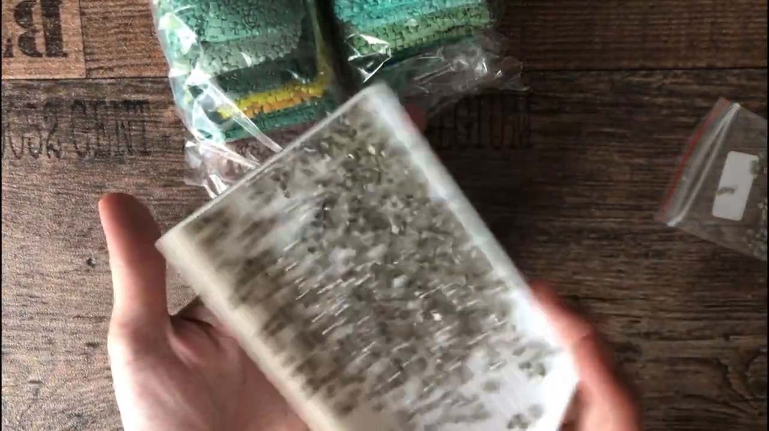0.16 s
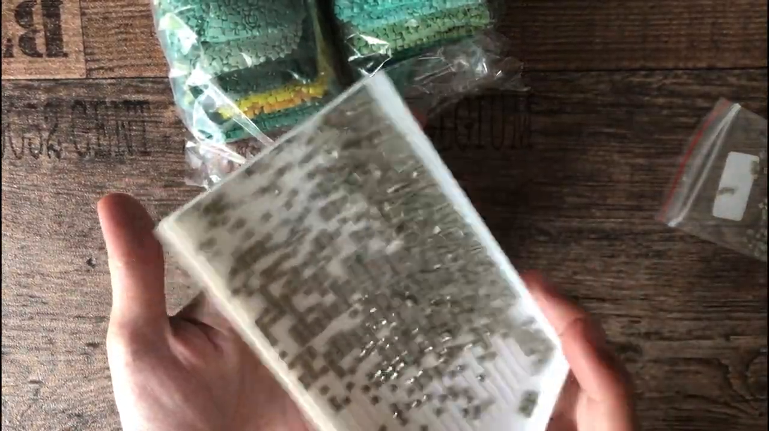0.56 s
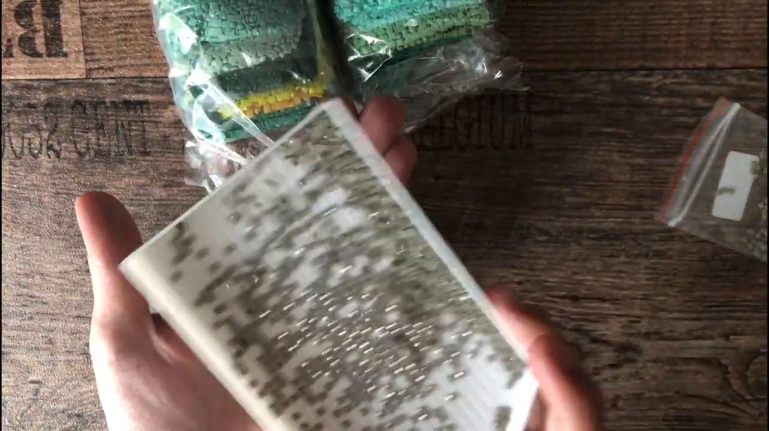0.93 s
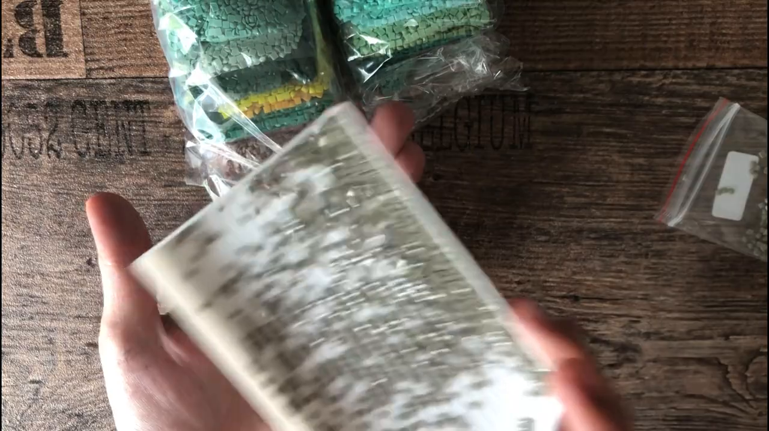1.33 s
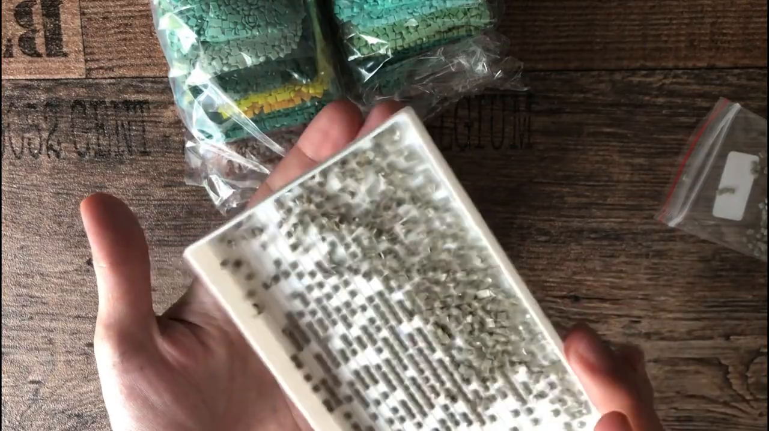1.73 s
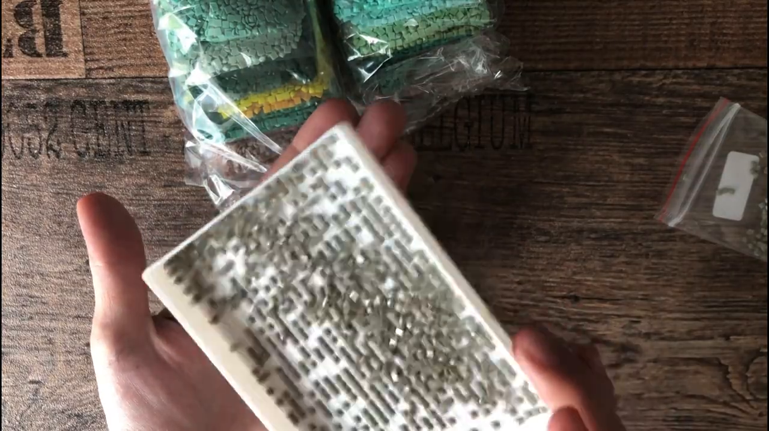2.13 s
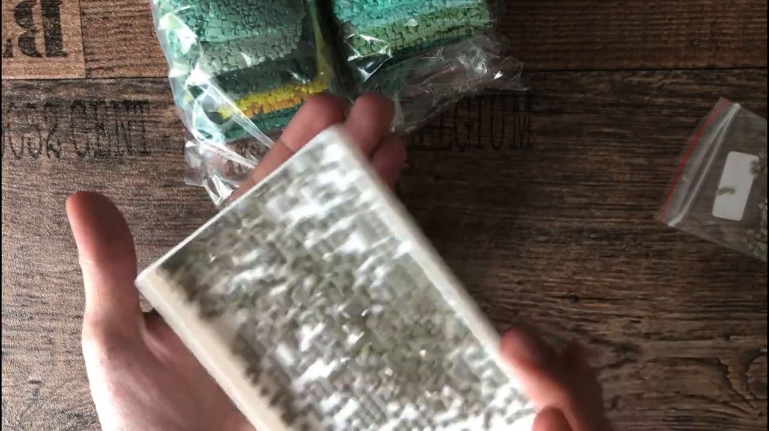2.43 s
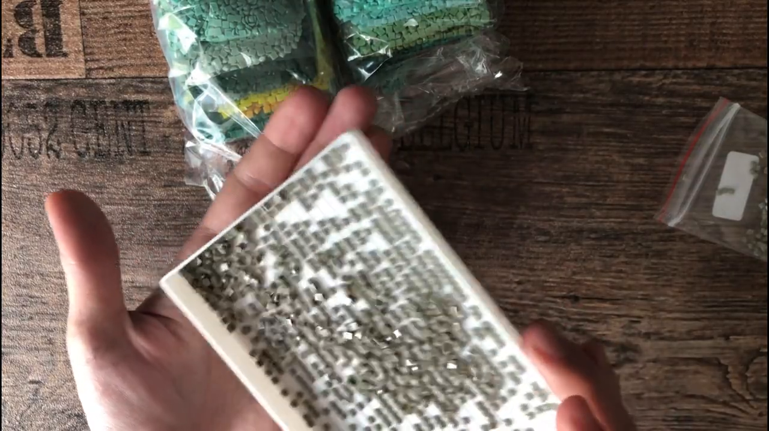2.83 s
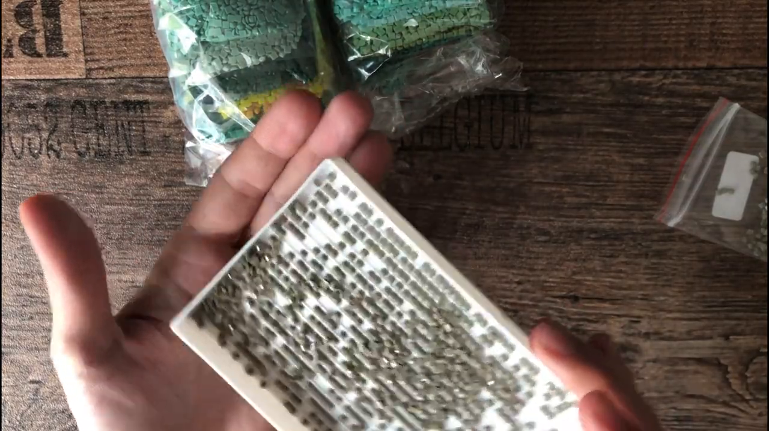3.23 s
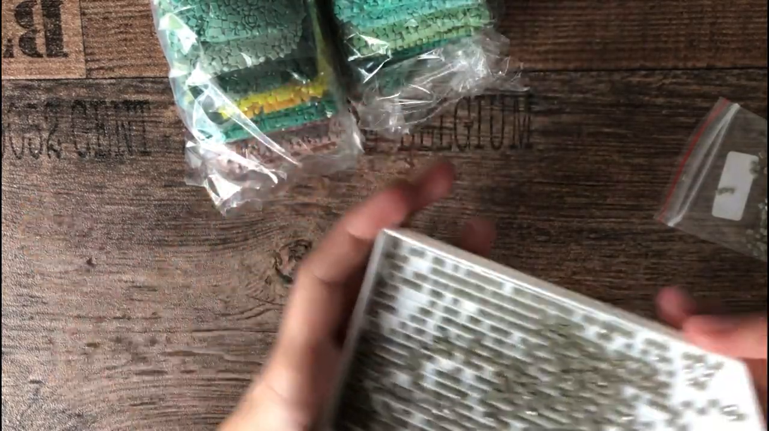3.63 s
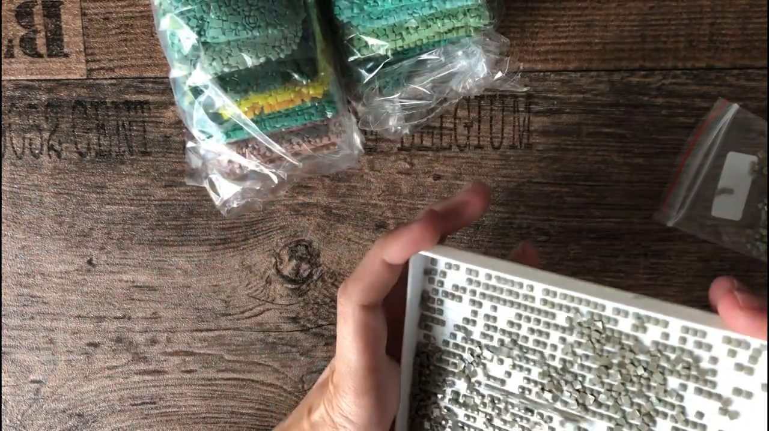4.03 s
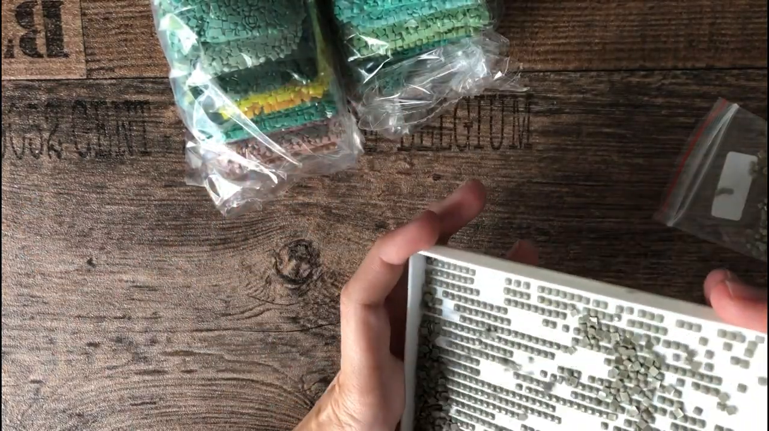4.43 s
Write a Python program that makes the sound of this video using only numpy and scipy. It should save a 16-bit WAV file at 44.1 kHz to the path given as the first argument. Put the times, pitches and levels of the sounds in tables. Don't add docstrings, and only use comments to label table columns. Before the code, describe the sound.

A dry, bright rattle of tiny hard beads in a thin ridged plastic tray, surging with each wrist stroke, about ten strokes in the first second, then slower swishes. One soft low knock against the palm. The colour shifts slightly as the tray tilts. After three seconds the shaking cuts off into low room hum, followed by a light trickle of crisp clicks. Close mono phone pickup, little reverb.

```python
import sys
import numpy as np
from scipy import signal
from scipy.fft import rfft, irfft
from scipy.io import wavfile
from scipy.ndimage import uniform_filter1d, map_coordinates

SR = 44100
rng = np.random.default_rng(int(sys.argv[2]) if len(sys.argv) > 2 else 0)


def invert_db(level):
    return 10 ** (np.asarray(level, dtype=float) / 20)


def digitize_waveform(pressure):
    field = np.atleast_2d(pressure).T
    bounded = np.clip(field, -1, 1)
    quanta = np.round(bounded * 32767).astype(np.int16)
    wavfile.write(sys.argv[1], SR, quanta)


N = 201729

# hz, density_db [dB per Hz]
ROOM_TONE = [(30, -10), (45, 1), (70, -7.5), (150, 2), (380, -2), (850, -7), (1000, -11), (2500, -19.5),
             (6000, -24), (15000, -27.5)]
ROOM_TONE_DB = -60
# peak_s, level_db
ARM_MOVES = [
    (.21, -63),
    (.86, -58),
    (1.18, -58),
    (1.93, -68),
    (2.7, -69),
    (3.89, -66),
    (4.15, -63),
]
ARM_REST_DB, ARM_HALF_S = -68, 0.068
# hz, t60_s
ROOM_DECAY = [(300, 0.35), (3000, 0.12), (12000, 0.066)]
# start_s, peak_db, hardness_db [dB per octave]
PALM_BUMPS = [
    (.716, -37.5, 11),
    (.7174, -30.3, -3.5),
    (.7527, -42.5, -14),
]
# pitch_hz, level_db, t60_s
TRAY_MODES = [
    (333, 0, .07),
    (640, -15.5, .135),
    (807, -16, .038),
]
# start_s, peak_db, pitch_hz
LONE_GEMS = [(0.5264, -19, 6850), (3.2974, -35, 6260), (3.4294, -48, 3520), (3.4434, -50, 3830),
             (3.5613, -42, 14500), (3.932, -50, 3290), (3.9825, -44, 3870), (3.9914, -51, 5460),
             (4.0264, -49, 7090), (4.0865, -39, 3390), (4.1114, -39, 3070), (4.1597, -37, 3880),
             (4.1664, -34, 3890), (4.24, -32, 3450), (4.2514, -32, 6300), (4.3104, -33, 3040),
             (4.3385, -30, 7000), (4.36, -25.5, 13200), (4.4004, -30, 14200), (4.4144, -29, 11500),
             (4.4204, -29, 12000), (4.4294, -30, 5380), (4.4587, -33, 3780), (4.4959, -32, 5220),
             (4.5104, -30, 14600), (4.5365, -26.5, 15400), (4.5614, -33, 3560)]
# start_s, pose [0 facing the microphone to 5 lowered]
TRAY_POSE = [(0, 0), (.65, 0), (.8, 1), (1.42, 1), (1.52, 2), (1.9, 2), (2.05, 3), (2.6, 3), (2.85, 4),
             (3.6, 4), (3.9, 5), (4.57, 5)]
# hz, density_db [dB per Hz]
POSE_COLOURS = [
    [(631, -12), (1040, -9), (1410, -12), (2150, -1), (3610, -3.5), (5780, -1.5), (7750, -3.5), (15000, -3)],
    [(640, -8), (1280, -12), (1540, -5.5), (2860, -3), (3670, -3), (5780, -1), (8220, -5), (15000, -3)],
    [(1050, -9), (1330, -18), (1790, -4), (3120, -5), (3720, -0.5), (5530, -3.5), (6890, -2.5),
     (15000, -4.5)],
    [(631, -13.5), (1020, -9), (1370, -16.5), (1690, -6), (2070, -1.5), (4010, -2), (5500, -4),
     (15000, -3.5)],
    [(540, -11), (1050, -9), (1600, -13), (1900, -10), (2150, 1), (2800, -2), (3720, 0.5), (15000, -7.5)],
    [(640, -9), (1580, -3.5), (2020, -4.5), (2540, -1), (3850, -1), (6250, -2.5), (8750, -6), (15000, -5.5)],
]
# hz, density_db [dB per Hz]
BASS_SKIRT = [(260, -51), (450, -19.5)]
# start_s, level_db, sparkle_db [above 9 kHz], size_spread_db
SLIDING = [(0, -37, -1, -1), (.88, -39, -1.5, 0.5), (.96, -41, -2.5, 3), (1.47, -55, 4, 3),
           (1.72, -58, 3, 1), (2.32, -43.5, -1.5, -3), (2.99, -47, 0, 2), (3.22, -41, 1, 4),
           (3.33, -59, 0, 3.5), (3.5, -72.5, -1, 3), (3.94, -76, -2, 1), (4.07, -58.5, -2, 0.5),
           (4.28, -47, 1, 1.5), (4.55, -49.5, 2.5, 2.5), (4.575, -55, -2, 2.5)]
# peak_s, peak_db, half_length_s, sparkle_db
WRIST_THROWS = [(0.043, -37, 0.044, -5), (0.15, -34.5, 0.032, -1), (0.238, -37.5, 0.028, -2),
                (0.343, -36, .032, 1.5), (.42, -39.5, .016, 5), (0.519, -34.5, .025, 2.5),
                (0.595, -40, 0.019, 1), (0.694, -39, 0.022, 5), (.772, -39, 0.029, 3),
                (0.857, -36, .028, 4), (1.05, -45, 0.016, -2), (1.165, -40, 0.04, 1),
                (1.308, -38, 0.045, 2), (1.39, -40.5, 0.035, -1.5), (1.52, -45, 0.026, -1),
                (1.634, -36, .089, -1.5), (1.811, -37, 0.042, -1.5), (1.966, -36.5, 0.069, -1.5),
                (2.106, -35, .059, -2), (2.296, -38.5, 0.068, -3.5), (2.467, -38, .046, -3.5),
                (2.59, -37.5, 0.051, -4.5), (2.809, -38.5, .075, 0.5), (2.951, -45, .017, 2),
                (3.09, -41.5, 0.032, 5), (3.205, -34.5, 0.0072, 2), (3.372, -56, 0.023, 1),
                (3.991, -63.5, .031, -3), (4.218, -50.5, .066, -2), (4.42, -53, 0.023, -2)]
THROWN_SPREAD_DB, SPREAD_DRIFT_DB = 1.2, 1.5
RATTLE_TRIM_DB = -0.96
TWO_STROKES = SR // 3


def unit(x):
    return x / np.sqrt(np.mean(x ** 2) + 1e-20)


def along(points, hz):
    f, v = np.transpose(points)
    return np.interp(np.log(hz + 1), np.log(f + 1), v)


def curves(rows):
    s, *columns = np.transpose(rows)
    return [np.interp(np.arange(N) / SR, s, column) for column in columns]


def wobble(rate_hz):
    knots = rng.standard_normal(int(N * rate_hz / SR) + 4)
    return map_coordinates(knots, [np.arange(N) * rate_hz / SR])


def coloured(x, spectrum):
    size = 2048
    hz = np.minimum(np.fft.rfftfreq(size, 1 / SR), 15000)
    cepstrum = irfft(np.log(np.maximum(invert_db(along(spectrum, hz)), 1e-4)))
    folded = np.r_[cepstrum[0], 2 * cepstrum[1:size // 2], np.zeros(size // 2)]
    return signal.fftconvolve(x, irfft(np.exp(rfft(folded))))[:N]


def band(x, lo_hz, hi_hz):
    sos = signal.butter(2, [lo_hz, hi_hz], "band", fs=SR, output="sos")
    return signal.sosfiltfilt(sos, x)


def pings(times_s, sizes, pitch_hz, life_s):
    k = np.arange(96)
    start = np.floor(times_s * SR).astype(int)
    t = (k + 1 - (times_s * SR - start)[:, None]) / SR
    decay = np.exp(-t / life_s[:, None])
    wave = sizes[:, None] * decay * np.cos(2 * np.pi * pitch_hz[:, None] * t)
    return np.bincount((start[:, None] + k).ravel(), wave.ravel(), N + len(k))[:N]


def swells(s, db, half_s):
    t = np.arange(0, N, 32) / SR
    return invert_db(2 * db[:, None]) * np.exp(-((t - s[:, None]) / half_s) ** 2), t


def arm_rumble():
    power, t = swells(*np.transpose(ARM_MOVES), ARM_HALF_S)
    level = np.sqrt(np.interp(np.arange(N) / SR, t, power.sum(0)) + invert_db(2 * ARM_REST_DB))
    return level * invert_db(-3.5) * unit(band(rng.standard_normal(N), 64, 118))


def air():
    level = invert_db(ROOM_TONE_DB + 0.44 * wobble(3.53))
    return level * unit(coloured(rng.standard_normal(N), ROOM_TONE)) + arm_rumble()


def room(x):
    step, wet = SR // 10, np.zeros(N + SR)
    for start in range(0, N, step):
        hz, t, z = signal.stft(rng.standard_normal(SR // 3), SR, nperseg=256)
        decay = invert_db(-60 * t / along(ROOM_DECAY, hz)[:, None])
        tail = signal.istft(z * decay, SR, nperseg=256)[1]
        piece = signal.fftconvolve(x[start:start + step], tail / np.linalg.norm(tail))
        wet[start + 200:][:len(piece)] += piece
    return wet[:N]


def bumps():
    t, x = np.arange(SR // 5) / SR, np.zeros(N)
    lowest_hz = TRAY_MODES[0][0]
    for s, peak_db, hard_db in PALM_BUMPS:
        ring = 0
        for hz, db, t60 in TRAY_MODES:
            mode_db = db + hard_db * np.log2(hz / lowest_hz) - 60 * t / t60
            ring = ring + invert_db(mode_db) * np.sin(2 * np.pi * hz * t)
        x[round(s * SR):][:len(t)] -= invert_db(peak_db) * ring
    return signal.sosfilt(signal.butter(4, 250, "high", fs=SR, output="sos"), x)


def ticks():
    s, db, hz = np.transpose(LONE_GEMS)
    s = s + .0002
    once, luck = np.ones(len(s)), rng.random((len(s), 2))
    ring = pings(s, invert_db(db - 5), hz, .0004 * once)
    click = pings(s, invert_db(db + 1), 9000 * once, .00003 * once)
    bright_hz = np.maximum(hz, 9000 + 6000 * luck[:, 1])
    bright = pings(s + .0003 * luck[:, 0], invert_db(db - 3), bright_hz, .0003 * once)
    return ring + click + bright


def shaking():
    s, db, half_s, sparkle_db = np.transpose(WRIST_THROWS)
    thrown, t = swells(s, db, half_s[:, None])
    now = np.arange(N) / SR
    slide_db, slide_sparkle, slide_spread = (np.interp(t, now, c) for c in curves(SLIDING))
    slide = invert_db(2 * slide_db)
    power = slide + thrown.sum(0)
    sparkle = (slide * slide_sparkle + sparkle_db @ thrown) / power
    spread = THROWN_SPREAD_DB + (slide_spread - THROWN_SPREAD_DB) * slide / power
    level, sparkle, spread = (np.interp(now, t, c) for c in (10 * np.log10(power), sparkle, spread))
    return level + RATTLE_TRIM_DB, sparkle, spread + SPREAD_DRIFT_DB * wobble(14)


def crowd(spread_db, count, life_ms):
    draw, luck = rng.random((count, 3)), rng.standard_normal((count, 2))
    times = draw[:, 0] * (N - 1) / SR
    spread = spread_db[(times * SR).astype(int)] * np.log(10) / 20
    life = life_ms * 0.00081 * np.exp(.5 * luck[:, 1])
    sizes = np.exp(spread * luck[:, 0] - spread ** 2) * np.sign(draw[:, 2] - .5)
    sizes = sizes / np.sqrt(life + 1 / SR)
    return unit(pings(times, sizes, draw[:, 1] * SR / 2, life))


def impacts(spread_db):
    patter = crowd(spread_db, count=45000, life_ms=0.11)
    rings = crowd(0.64 * spread_db, count=16000, life_ms=0.53)
    snaps = crowd(spread_db + 1.0, count=1500, life_ms=0.022)
    clumps = invert_db(0.53 * wobble(200))
    return (patter + invert_db(-5.5) * rings) * clumps + invert_db(-12.5) * unit(np.diff(snaps, prepend=0))


def posed(hits):
    pose, = curves(TRAY_POSE)
    x = 0
    for k, colour in enumerate(POSE_COLOURS):
        seen = coloured(hits, BASS_SKIRT + colour)
        x = x + np.clip(1 - abs(pose - k), 0, 1) * seen / np.std(band(seen, 1800, 9000))
    facing = np.clip(2 - pose, 0, 1)
    return x + facing * (.25 * band(x, 5500, 6150) - .22 * band(x, 3450, 4050))


def gems():
    rattle_db, sparkle_db, spread_db = shaking()
    x = posed(impacts(spread_db))
    body, middle = band(x, 100, 1300), band(x, 1300, 9000)
    treble = x - body - middle
    body_db = 0.35 * (uniform_filter1d(rattle_db, size=TWO_STROKES) - rattle_db)
    return invert_db(rattle_db) * (invert_db(body_db) * body + middle + invert_db(sparkle_db) * treble)


def scene():
    tray = gems() + ticks() + bumps()
    return (tray + invert_db(-13) * room(tray) + air())[None]


def top_cut(x):
    return signal.sosfilt(signal.butter(12, 17070, fs=SR, output="sos"), x)


def record(dry):
    hz = np.fft.rfftfreq(N, 1 / SR)
    treble_cut = np.clip((15770 - hz) / 50, 0, 1)
    bass_cut = hz ** 6 / (hz ** 6 + 33 ** 6)
    kept = irfft(rfft(dry) * treble_cut * bass_cut, N)
    return top_cut(kept)


dry = scene()
out = record(dry)
digitize_waveform(out)
```